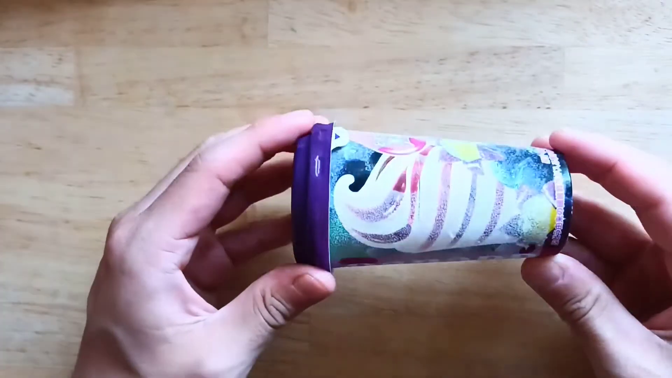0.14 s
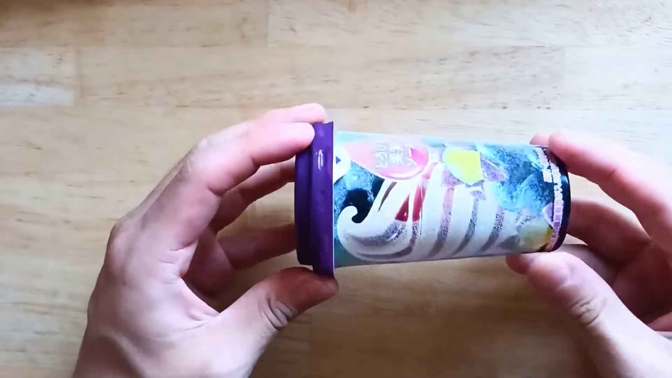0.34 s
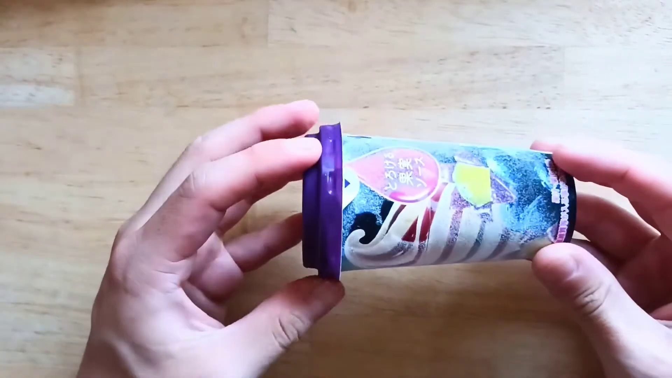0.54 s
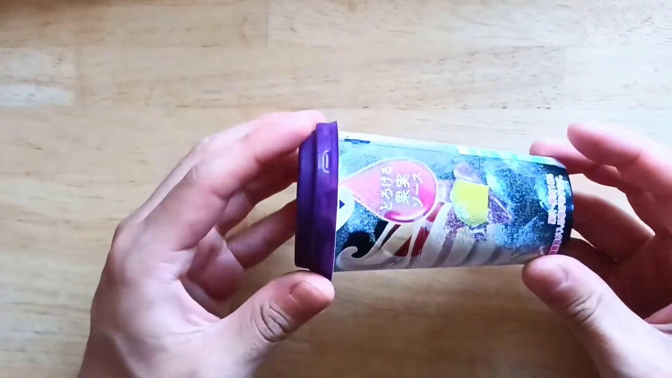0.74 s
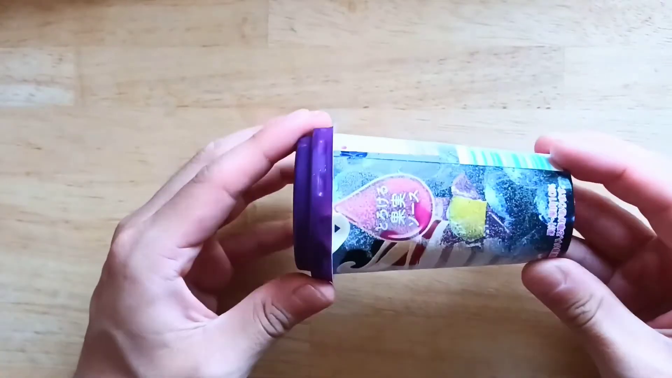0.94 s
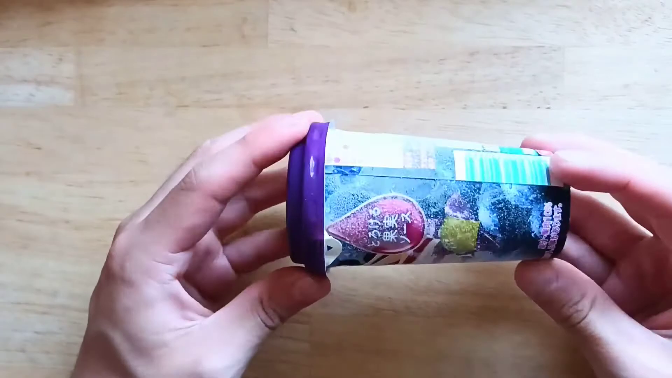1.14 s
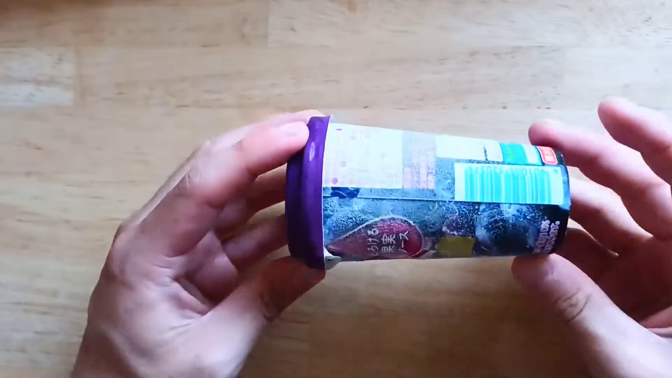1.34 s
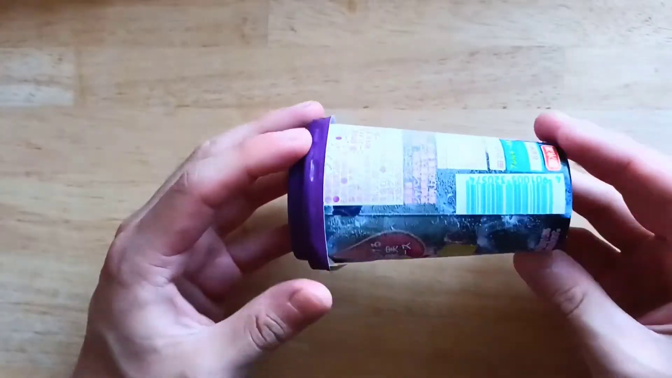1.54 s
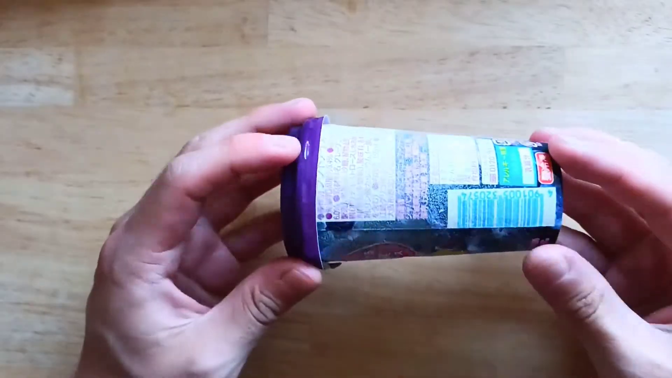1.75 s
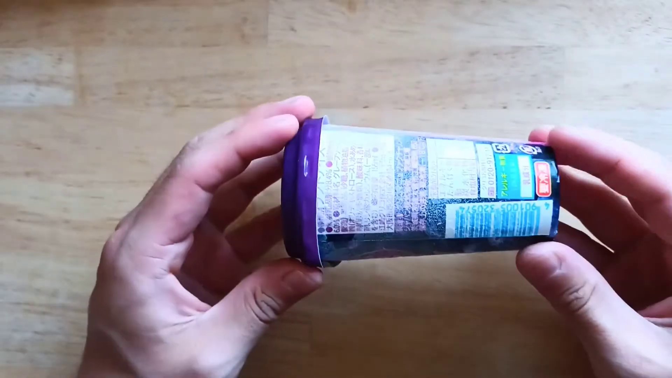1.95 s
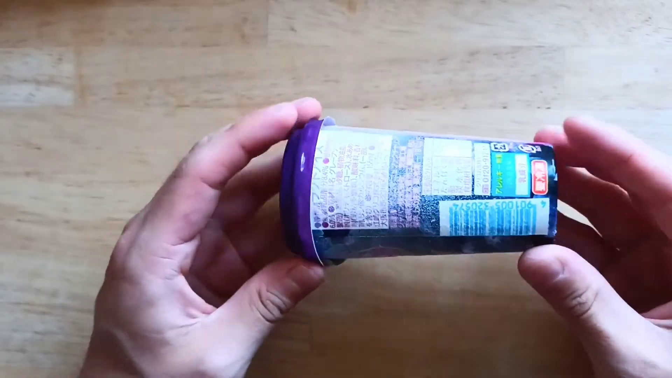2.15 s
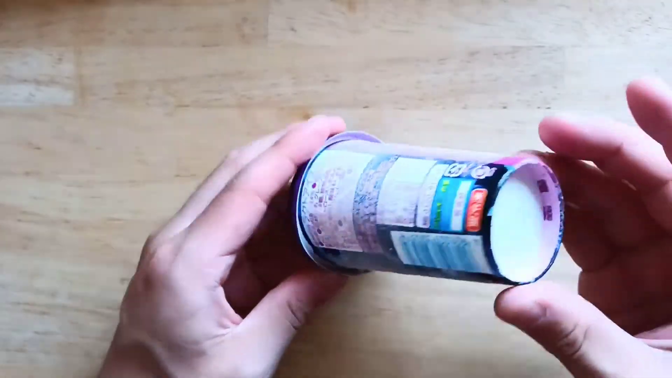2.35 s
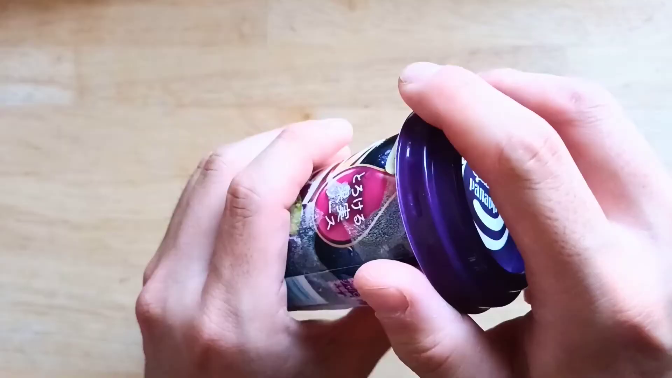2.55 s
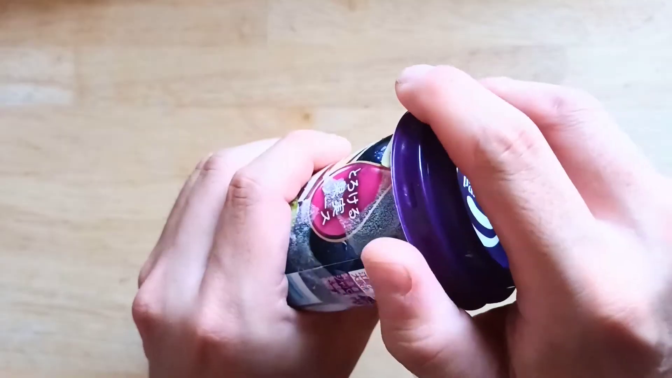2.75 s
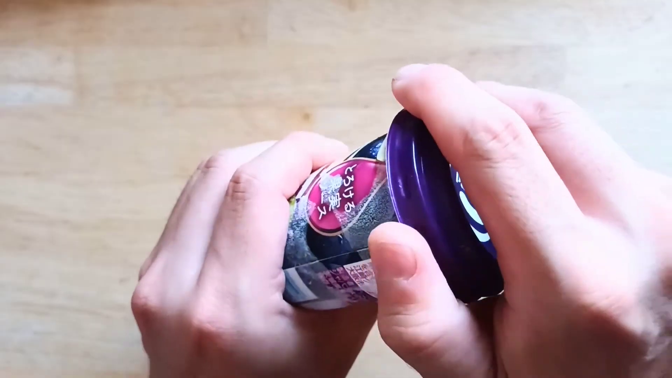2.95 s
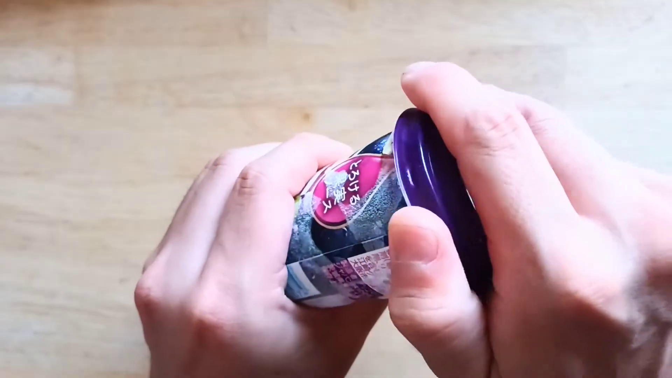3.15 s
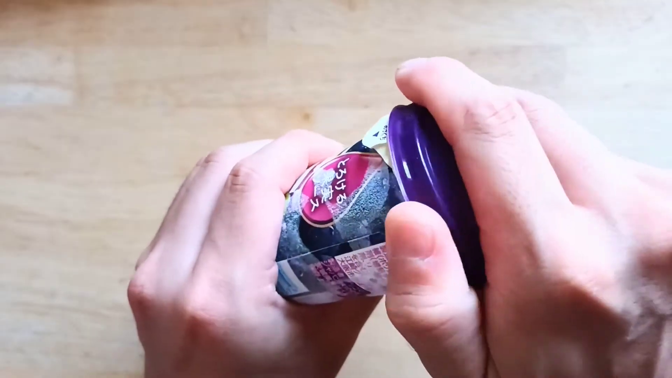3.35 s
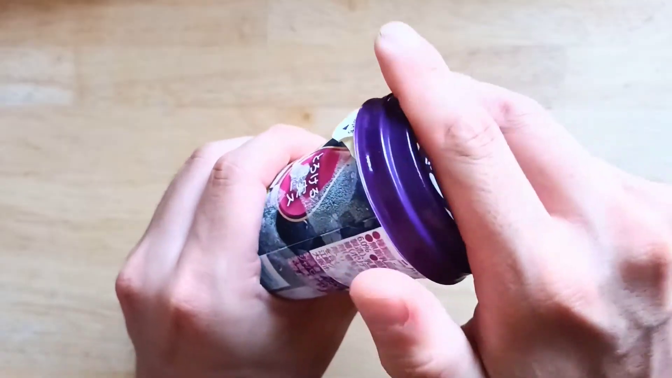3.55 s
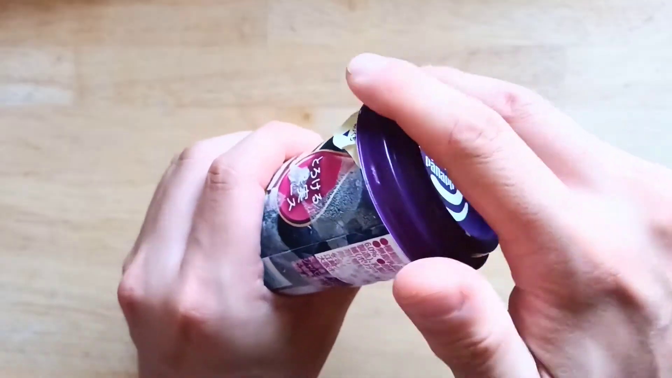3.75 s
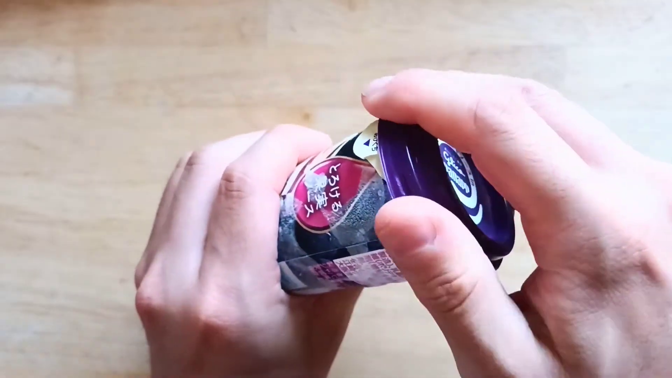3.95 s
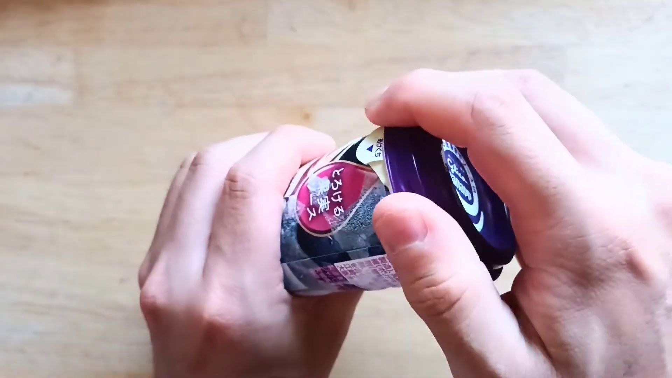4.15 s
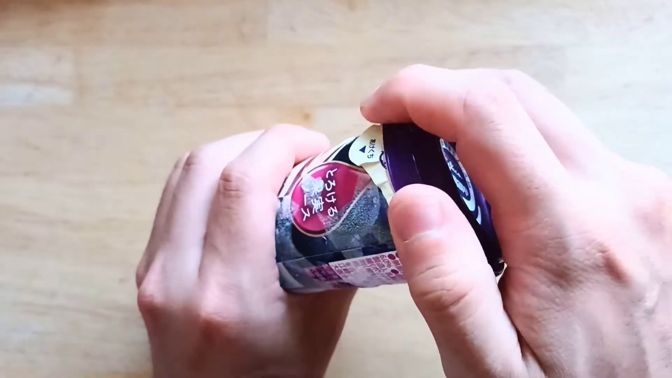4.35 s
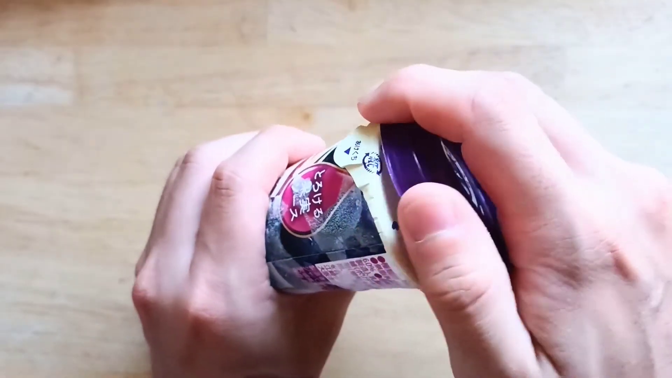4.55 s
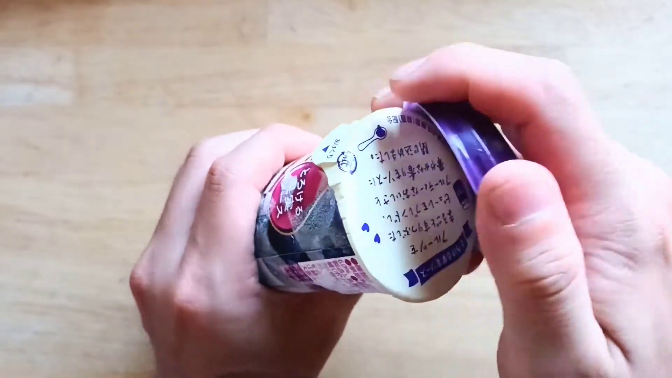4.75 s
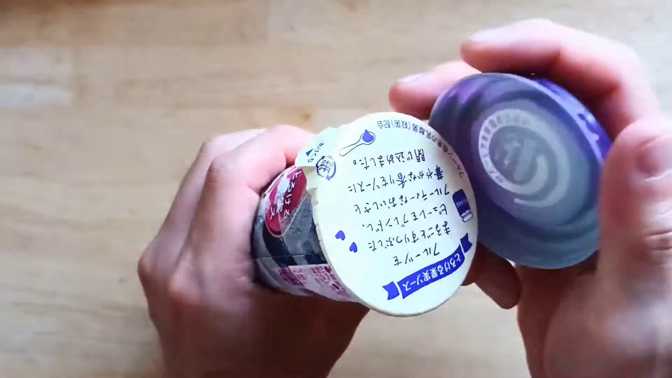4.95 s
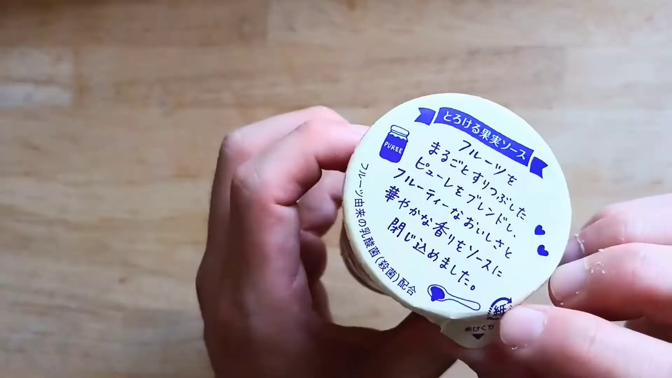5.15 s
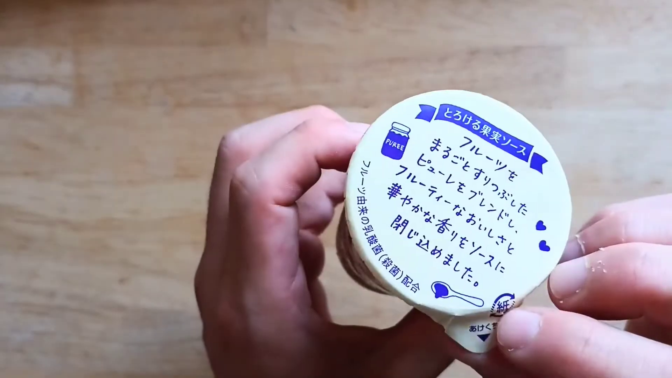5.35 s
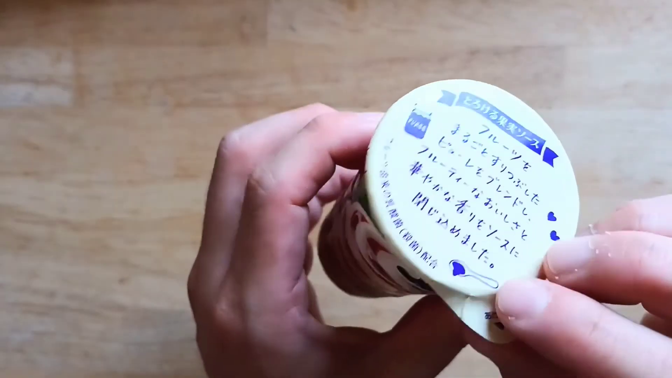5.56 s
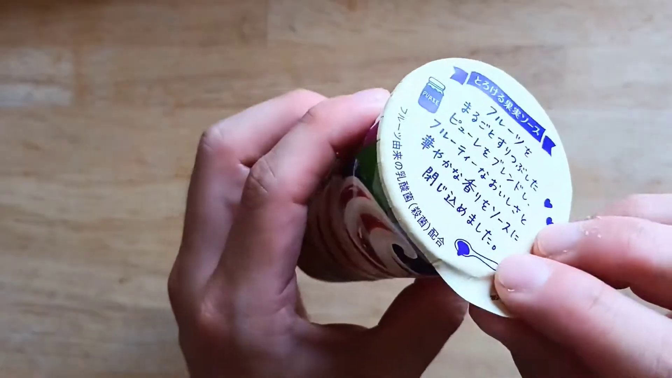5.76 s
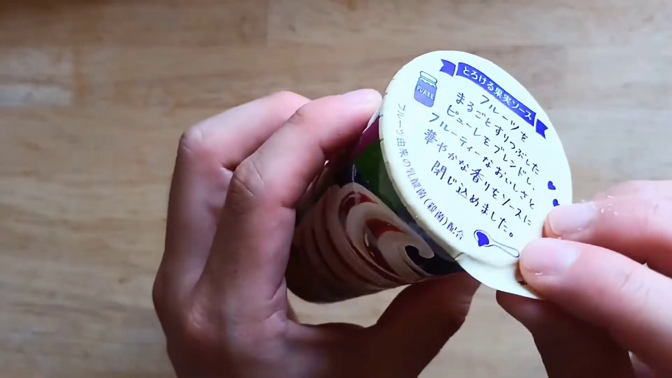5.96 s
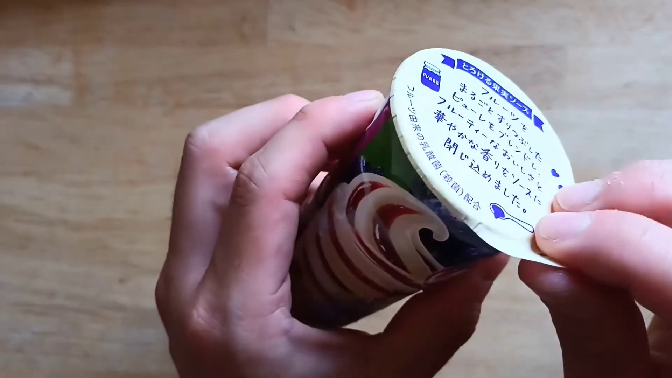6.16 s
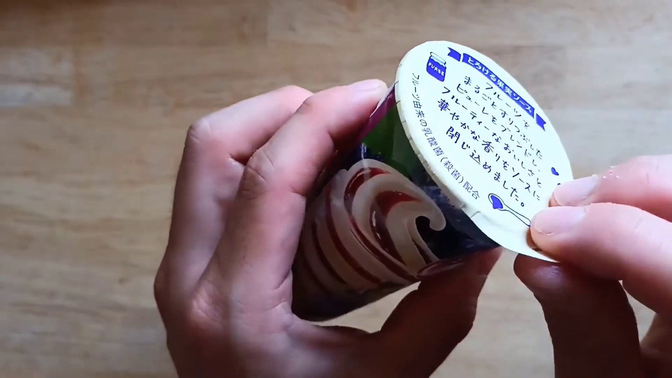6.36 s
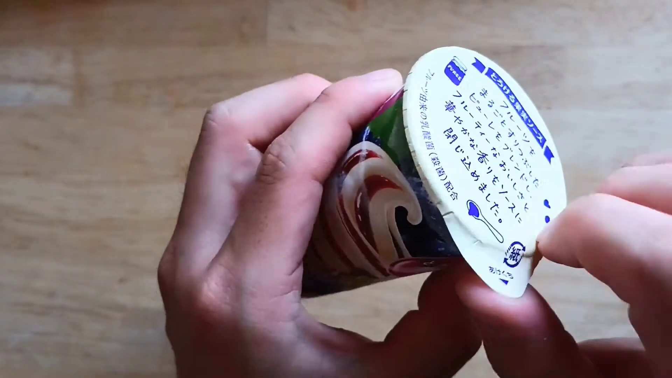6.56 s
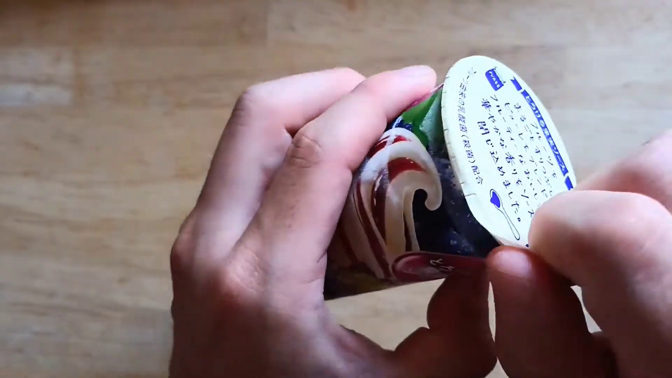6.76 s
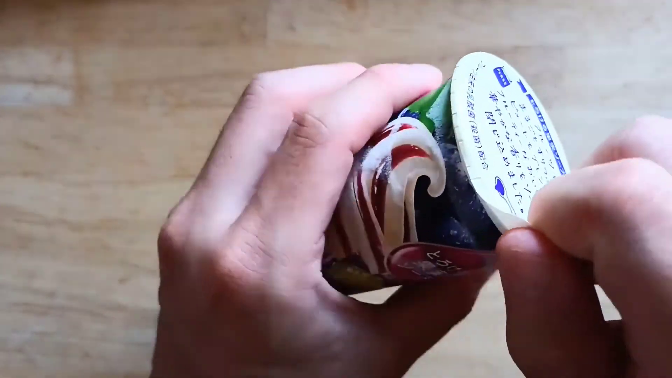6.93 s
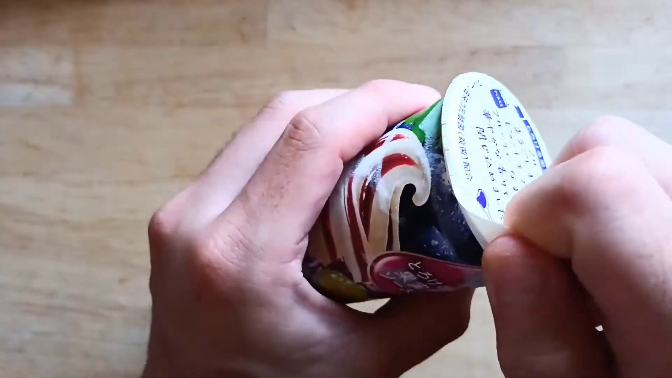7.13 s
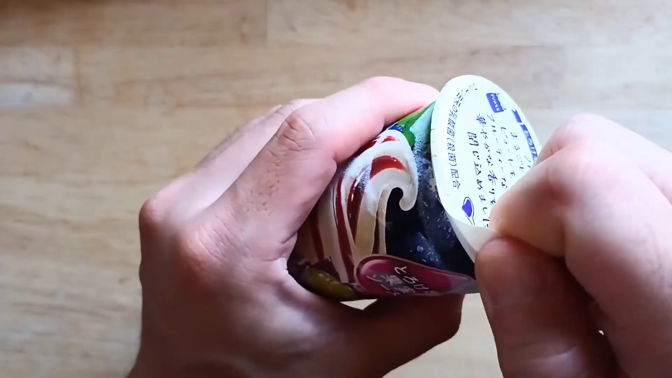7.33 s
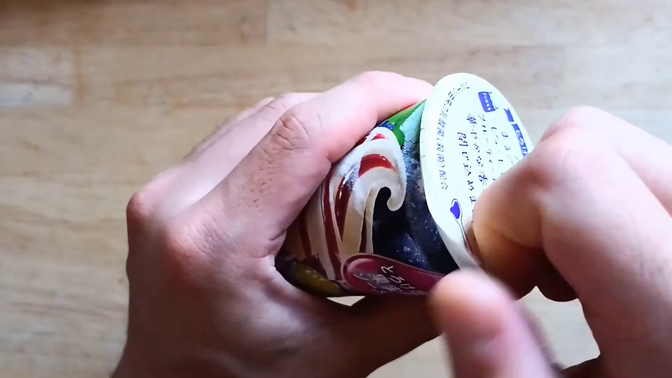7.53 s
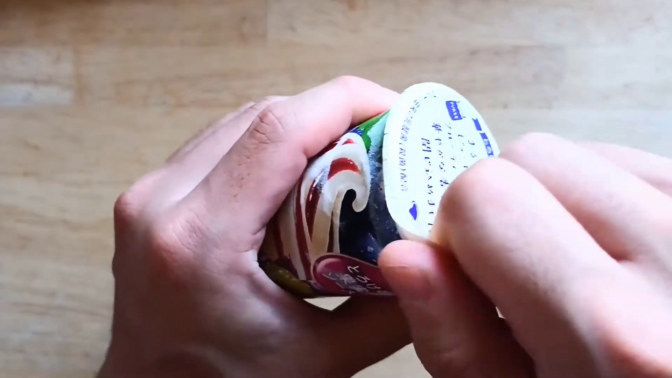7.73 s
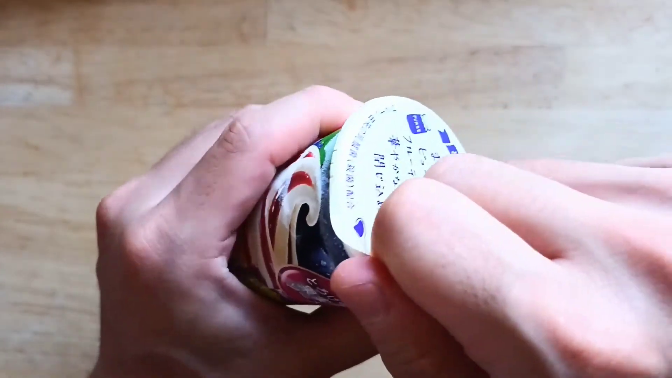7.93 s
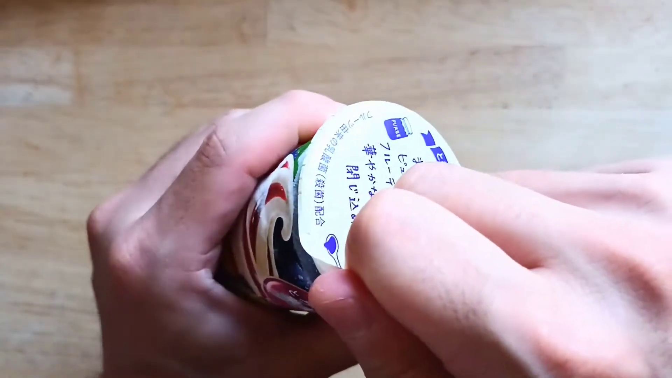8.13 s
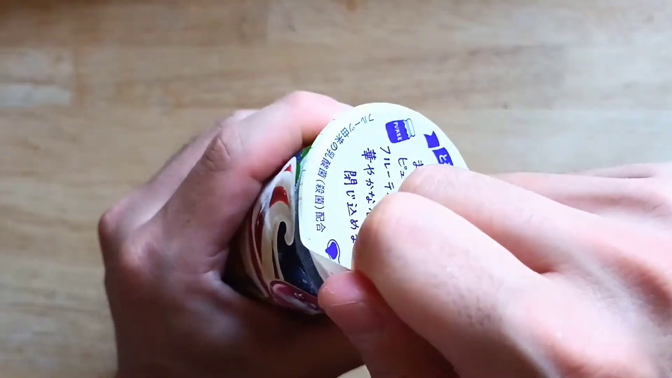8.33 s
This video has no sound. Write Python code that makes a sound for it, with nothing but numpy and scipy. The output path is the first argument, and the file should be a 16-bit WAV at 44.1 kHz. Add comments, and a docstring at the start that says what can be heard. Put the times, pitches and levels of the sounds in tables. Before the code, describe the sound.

Hands rub an ice cream cup, its plastic cap ticks and snaps off, then the foil seal cracks loose and crinkles.

```python
"""A small, quiet room; hands turn an ice cream cup close to a stereo microphone, stronger on the left.
Fingertips brush the cup's wall. The plastic overcap scrapes over the rim, snaps free and slides off
with small knocks and ticks. Then the foil seal is pulled by its tab: it cracks loose from the rim twice
and crinkles. Snaps and knocks are quickly damped modes; the rubbing is a stream of tiny slips.
The room answers briefly, over a steady low rush."""
import sys
import numpy as np
from scipy import signal
from scipy.fft import rfft, irfft, next_fast_len
from scipy.io import wavfile

SR = 44100
rng = np.random.default_rng(int(sys.argv[2]) if len(sys.argv) > 2 else 0)


def transcribe(u):
    """Save the signal u as a 16-bit wav file named by the first command-line argument.

    u: samples, shape (n,) or (channels, n), limited to [-1, 1]; the rate is SR.
    q: integer samples, one column per channel.
    """
    v = np.clip(np.atleast_2d(u).T, -1, 1)
    q = np.round(v * 32767).astype(np.int16)
    wavfile.write(sys.argv[1], SR, q)


N = 374409

# modes of the plastic cap: pitch_hz, level_db, t60_s
CAP_MODES = [(388, -20.5, 0.018), (820, -9.5, 0.034), (1204, -1.5, 0.013), (1476, -2, 0.011),
             (1940, -5, 0.021), (2340, -8.5, 0.019), (2770, -6.5, 0.014), (4300, -9, 0.018),
             (4750, -8.5, 0.0057), (6100, -19, 0.006), (8400, -17, .007)]
# cup wall under sliding contact, cap seated and cap loose: centre_hz, width_hz, level_db
SEATED_WALL = [(1350, 410, 3), (2155, 280, 5), (2920, 180, 2), (3840, 460, -4)]
LOOSE_WALL = [(1460, 1200, -9.5), (1995, 230, 6), (3020, 490, 1.5), (3800, 3100, -5.5)]
# hiss spectrum of scraping plastic and foil: frequency_hz, level_db
SCRAPE_HISS = [(2000, -9), (3800, -1), (6000, -1.5), (8300, 3), (10500, -1), (13000, -7.5), (16000, -16)]


def cap_snaps():
    """The cap's lip jumps the rim, then its far side lets go."""
    # start_s, level_db, note_hz, note_db, tilt_db_per_octave, crack_db, room_db, upper_mode_ratio
    releases = [(3.3002, -14.5, 1300, -0.5, 3.5, -17, -32.5, 1.0),
                (4.7442, -39.5, 2930, 3.5, 18.5, 5.5, -64, 1.24)]
    # what the cap throws into the room: frequency_hz, level_db
    spread = [(180, -55), (300, -30), (343, -12), (511, -23), (946, 1), (1120, -9), (1560, 0), (2140, -9),
              (2650, -3.5), (3130, -25), (4590, -17.5), (5340, -27), (7570, -23), (16000, -43)]
    return snaps(releases, CAP_MODES, spread, table_db=-32, t60_ratio=0.82, hollow_db=-0.5,
                 low_hz=200, split_hz=9400)


def seal_cracks():
    """The seal breaks from the rim; its taut flap sounds a note, higher the second time."""
    # start_s, level_db, note_hz, note_db, tilt_db_per_octave, crack_db, room_db, upper_mode_ratio
    releases = [(7.7449, -11.5, 1670, 0.5, 1.5, -14.5, -30.5, 0.993),
                (8.2820, -18, 2010, 4.5, 9, -6.5, -38, 1.065)]
    # the seal and the rim it is stuck to: pitch_hz, level_db, t60_s
    modes = [(780, -12.5, 0.013), (1190, -15, 0.035), (1450, -8.5, 0.037), (2280, -4, 0.012),
             (2720, -3, 0.01), (3060, -1, 0.0094), (3230, -18, 0.02), (3330, -21, 0.027),
             (4150, -10.5, 0.019), (6280, -15.5, 0.0083), (6740, -34, 0.0076)]
    # what the seal throws into the room: frequency_hz, level_db
    spread = [(180, -61), (300, -42), (678, -16.5), (885, -15.5), (1300, -12), (1430, -0.5), (1660, 0),
              (2610, -4.5), (3350, -15), (3700, -15), (5520, -25), (7690, -18.5), (14500, -41),
              (16000, -52)]
    return snaps(releases, modes, spread, table_db=-15.5, t60_ratio=1.0, hollow_db=-7,
                 low_hz=690, split_hz=5000)


def snaps(releases, modes, spread, table_db, t60_ratio, hollow_db, low_hz, split_hz, table_s=0.002426):
    """Stored strain lets go at once: the part rings, the table reflects it, hollow and room answer."""
    # the cup's hollow rings on faintly: pitch_hz, level_db, t60_s
    hollow_modes = [(1490, 1, 0.14), (1690, -16, 0.24), (4140, -14, .14)]
    out, t = np.zeros((2, N)), np.arange(SR // 3) / SR
    hollow = sum(damped_sine(t, hz, db + hollow_db, t60) for hz, db, t60 in hollow_modes)
    for s, db, note_hz, note_db, db_per_octave, crack_db, room_db, ratio in releases:
        tilt_db = lambda f: db_per_octave * np.log2(np.clip(f, 2000, 3500) / 2000)
        tilted = [(hz * ratio if hz > note_hz else hz, level + tilt_db(hz), t60)
                  for hz, level, t60 in modes]
        blow = amp(db) * ring(sorted(tilted + [(note_hz, note_db, 0.018)]), crack_db, scatter_db=0)
        blow = blow + amp(table_db) * np.roll(blow, round(table_s * SR))
        blow = filtered(blow, lambda f: 1j * f / (low_hz + 1j * f))  # a small part radiates little bass
        add(out, s, at_microphones(blow, split_hz))
        add(out, s, amp(room_db) * at_microphones(hollow, split_hz=11000))
        add(out, s, amp(room_db) * room_tail(lambda f: amp(along(spread, f) + tilt_db(f)), t60_ratio))
    return out


def ring(modes, crack_db, scatter_db, crack_t60_s=0.011, crack_low_hz=1500, crack_top_hz=9500):
    """One blow: quickly damped modes under a short burst of fracture noise."""
    t = np.arange(SR // 12) / SR
    offsets_db = rng.normal(0, 1, len(modes)) * scatter_db
    body = sum((-1) ** k * damped_sine(t, hz, db + offsets_db[k], t60)
               for k, (hz, db, t60) in enumerate(modes))
    band = lambda f: (1j * f / (crack_low_hz + 1j * f)) ** 2 / (1 + (f / crack_top_hz) ** 6)
    noise = unit(filtered(rng.standard_normal(len(t)), lambda f: resonance(f, 1900, 9100) * band(f)))
    return body + amp(crack_db - 60 * t / crack_t60_s) * noise


def knocks(gain_db=2, relative_width=0.46):
    """Soft contacts ring the cap around a pitch set by where they land."""
    # cap and fingers meet the cup: start_s, level_db, centre_hz
    contacts = [(2.664, -42.5, 1420), (2.755, -46, 1380), (3.456, -34, 2890), (3.563, -41.5, 1370),
                (3.854, -38, 1470), (3.897, -39, 1210), (3.973, -35, 1300), (4.129, -39, 1270),
                (4.394, -43, 1460), (4.521, -36, 1700), (4.631, -38.5, 1250), (5.071, -38.5, 910),
                (6.025, -43.5, 1870), (7.628, -38.5, 1260), (7.663, -46.5, 2310)]
    out = np.zeros(N)
    for s, db, hz in contacts:
        blow = ring(CAP_MODES, crack_db=-4.5, scatter_db=4.5)
        knock = filtered(blow, lambda f: resonance(f, hz, relative_width * hz))
        add(out, s, amp(db + gain_db) * knock / np.abs(knock).max())
    return in_room(out, room_db=-8, split_hz=7900)


def ticks(gain_db=4, t60_s=0.0074, attack_s=0.00054, relative_width=0.27):
    """Plastic edges and foil creases tick: milliseconds of crackle in one broad, high resonance."""
    # the clearest ticks: start_s, level_db, centre_hz, left_minus_right_db
    clear_ticks = [(0.6345, -45, 8140, 2.5), (1.5988, -43.5, 8690, -6), (2.8614, -40.5, 9560, 6),
                   (2.9058, -40.5, 9110, 2.0), (2.9367, -39, 12000, 0.5), (3.1981, -34.5, 10400, 2.5),
                   (3.235, -26, 10900, 9), (3.362, -30.5, 10200, 3.0), (3.4321, -35.5, 11200, 2.5),
                   (3.458, -30, 7900, 4), (3.8004, -39, 9630, 3), (3.897, -33.5, 8400, -0.5),
                   (3.9719, -33.5, 8850, 1), (4.7102, -31, 14700, 4), (4.7334, -35, 7280, 5),
                   (4.7447, -28.5, 7140, 5), (5.0424, -37.5, 8550, 4), (5.0724, -37.5, 8840, 3),
                   (6.757, -46, 8370, 1.0), (8.2172, -44, 11300, 6)]
    out, t = np.zeros((2, N)), np.arange(SR // 20) / SR
    envelope = amp(-60 * t / t60_s) * (1 - np.exp(-t / attack_s))
    for s, db, hz, pan_db in list(clear_ticks) + strain_ticks():
        crackle = uneven(envelope * rng.standard_normal(len(t)), unlike=0.94)
        tick = filtered(crackle, lambda f: resonance(f, hz, relative_width * hz) * resonance(f, hz, 2 * hz))
        pan = amp([[pan_db / 2], [-pan_db / 2]])
        add(out, s, amp(db + gain_db) * pan * tick / np.abs(tick).max())
    return in_room(out, room_db=-9, split_hz=12200)


def strain_ticks(per_s=27, centre_hz=9200, pan_db=8, scatter_db=7):
    """Strained plastic and foil tick at uneven moments; gives rows for ticks()."""
    # spells of strain: start_s, end_s, level_db
    strains = [(2.822, 3.057, -55), (8.076, 8.29, -52.5), (8.328, 8.381, -31), (8.429, 8.479, -43)]
    rows = []
    for start, end, db in strains:
        count = max(1, round((end - start) * per_s))
        for k, (when, size) in enumerate(rng.random((count, 2))):
            s = start + (end - start) * (k + when) / count
            rows.append((s, db + scatter_db * (2 * size - 1), centre_hz, pan_db))
    return rows


def cap_rasp():
    """The cap's lip rasps on the rim with each push."""
    # peak_s, rise_s, fall_s, hiss_db, body_db
    pushes = [(3.212, .014, .03, -56, -57), (3.243, 0.013, 0.017, -35, -38.5),
              (3.458, 0.0069, 0.0074, -43, -44), (3.786, 0.024, 0.015, -54.5, -54),
              (4.207, 0.026, 0.017, -64, -59), (4.32, 0.066, 0.059, -70, -63),
              (4.408, 0.022, 0.081, -54, -52), (4.628, 0.035, 0.017, -48.5, -49)]
    return friction(strokes(pushes), SCRAPE_HISS, SEATED_WALL,
                    slips_per_s=4200, scatter_db=2, hiss_db=1, body_db=0.5)


def cap_slide():
    """The cap is drawn off at an even speed, first tilted on the rim, then loose."""
    # the two draws: start_s, length_s, hiss_db, body_db
    draws = [(4.655, 0.086, -59.5, -55), (4.752, 0.14, -60, -52.5)]
    # cup wall with the cap tilted: centre_hz, width_hz, level_db
    tilted_wall = [(1560, 390, -6), (2870, 120, 3), (3970, 890, -25)]
    tilted = friction(even_draw(*draws[0]), SCRAPE_HISS, tilted_wall,
                      slips_per_s=6300, scatter_db=1, hiss_db=0, body_db=-0.5)
    loose = friction(even_draw(*draws[1]), SCRAPE_HISS, LOOSE_WALL,
                     slips_per_s=7600, scatter_db=3, hiss_db=0.5, body_db=0)
    return tilted + loose


def foil_crinkle():
    """The foil crinkles in sparser grains with each tug at its tab."""
    # peak_s, rise_s, fall_s, hiss_db, body_db
    tugs = [(7.578, 0.091, 0.02, -64, -62.5), (7.63, 0.034, .025, -60, -59), (7.68, .03, 0.095, -64, -61.5),
            (8.24, 0.23, 0.079, -70, -78), (8.35, 0.053, 0.05, -47, -55), (8.464, 0.035, .045, -54.5, -51)]
    return friction(strokes(tugs), SCRAPE_HISS, LOOSE_WALL,
                    slips_per_s=2400, scatter_db=3.5, hiss_db=0.5, body_db=1.5)


def finger_brushes():
    """Skin brushes smoothly over the cup as it is turned."""
    # peak_s, rise_s, fall_s, hiss_db, body_db
    brushes = [(0.057, .036, .02, -57.5, -64), (0.398, .03, .013, -64.5, -76),
               (0.635, 0.0071, 0.015, -50.5, -78), (0.82, .05, 0.032, -67, -76),
               (1.295, .013, 0.032, -66, -76), (1.622, 0.0087, .07, -64.5, -75),
               (2.245, .02, .025, -61.5, -65), (2.395, 0.09, 0.082, -66, -65.5),
               (2.585, .016, 0.018, -59, -60), (2.69, 0.024, .023, -52, -56.5),
               (5.055, .03, .03, -61.5, -57.5), (5.5, .02, 0.021, -65, -59.5),
               (5.577, 0.04, 0.075, -60, -61.5), (6.56, 0.21, 0.15, -66, -63),
               (6.76, 0.023, 0.037, -60.5, -56)]
    # hiss spectrum of skin on the cup: frequency_hz, level_db
    skin_hiss = [(2500, -55), (4000, -16.5), (6000, -10), (8500, -5), (10500, -8.5), (13000, -16),
                 (16000, -21)]
    return friction(strokes(brushes), skin_hiss, SEATED_WALL,
                    slips_per_s=10000, scatter_db=6.5, hiss_db=0.5, body_db=-0.5)


def friction(gains, hiss_spectrum, wall, slips_per_s, scatter_db, hiss_db, body_db):
    """Tiny slips of uneven size hiss at the contact and excite the wall."""
    sizes = rng.choice([-1, 1], N) * amp(scatter_db * np.clip(rng.standard_normal(N), -2, 2))
    slips = (rng.random(N) < slips_per_s / SR) * sizes
    hiss = unit(filtered(uneven(slips, unlike=0.57), lambda f: amp(along(hiss_spectrum, f))))
    wall_response = lambda f: sum((-1) ** k * amp(db) * resonance(f, hz, width)
                                  for k, (hz, width, db) in enumerate(wall))
    body = unit(filtered(slips, lambda f: resonance(f, 1700, 5100) * wall_response(f)))
    return amp(hiss_db) * gains[0] * hiss + amp(body_db) * gains[1] * body


def strokes(rows):
    """Hiss and body gains of short strokes that peak and die away."""
    t = np.arange(N) / SR
    gains = np.zeros((2, N))
    for s, rise, fall, hiss_db, body_db in rows:
        near = slice(*np.searchsorted(t, [s - 5 * rise, s + 5 * fall]))
        gains[:, near] += amp([[hiss_db], [body_db]]) * swell(t[near], s, s, rise, fall)
    return gains


def even_draw(start_s, length_s, hiss_db, body_db, edge_s=0.0083):
    """Hiss and body gains of one even slide."""
    t = np.arange(N) / SR
    return amp([[hiss_db], [body_db]]) * swell(t, start_s, start_s + length_s, edge_s, edge_s)


def swell(t, start, end, rise, fall, drop_db=13.5, roundness=1.66):
    """Gain of 1 from start to end, down by drop_db one rise before and one fall after."""
    away = np.maximum(start - t, 0) / rise + np.maximum(t - end, 0) / fall
    return amp(-drop_db * np.minimum(away, 10) ** roundness)


def finger_thuds(pitch_hz=290, t60_s=0.029):
    """A soft finger pad gives the cup one low push that is damped at once."""
    # start_s, level_db
    landings = [(3.24, -42), (5.072, -43.5), (8.477, -40.5)]
    out, t = np.zeros(N), np.arange(SR // 12) / SR
    for s, db in landings:
        add(out, s, damped_sine(t, pitch_hz, db, t60_s))
    return in_room(out, room_db=-24, split_hz=6000)


def in_room(x, room_db, split_hz):
    """A close sound at both microphones, with the room's answer."""
    # spectrum of the reverberation: frequency_hz, level_db
    colour = [(300, 10), (2000, -4), (3200, 2.5), (6000, -1), (14000, 2.5)]
    tail = room_tail(lambda f: amp(along(colour, f)), t60_ratio=0.58)
    wet = signal.fftconvolve(np.atleast_2d(x), tail / np.linalg.norm(tail[0]), axes=1)[:, :N]
    return at_microphones(x, split_hz) + amp(room_db) * wet


def room_tail(colour, t60_ratio, build_s=0.00054):
    """A diffuse stereo tail of noise; the middle frequencies last longest."""
    # room decay, scaled by t60_ratio: frequency_hz, base_t60_s
    decay = [(300, 0.23), (1500, 0.38), (3000, .37), (6000, 0.36), (12000, 0.31)]
    noise = unit(filtered(rng.standard_normal((2, SR // 2)), colour))
    hz, t, spectra = signal.stft(noise, SR, nperseg=256)
    fade = amp(-60 * t / along(decay, hz)[:, None] / t60_ratio) * (1 - np.exp(-t / build_s))
    return signal.istft(spectra * fade, SR, nperseg=256)[1]


def room_tone(level_db=-57, low_cut_hz=52):
    """Steady low rush of the room with a faint microphone hiss."""
    # rush and hiss: frequency_hz, level_db
    spectrum = [(35, -9.5), (60, 0.5), (139, 0), (176, -1.5), (294, -2.5), (389, -7.5), (417, -8.5),
                (621, -9), (1090, -12), (1950, -13.5), (4320, -24.5), (6580, -25.5), (7750, -21.5),
                (14900, -25.5), (16000, -22.5)]
    # likeness of left and right: frequency_hz, correlation
    likeness = [(60, 0), (130, 0), (3100, 0), (5000, 0), (6800, 0.58), (9000, 1), (15000, 1)]
    side_gain = lambda f: np.tan(np.arccos(np.clip(along(likeness, f), -1, 1)) / 2)
    colour = lambda f: amp(along(spectrum, f)) * f ** 2 / np.sqrt(f ** 4 + low_cut_hz ** 4)
    noise = rng.standard_normal((2, N))
    mid, side = filtered(noise, lambda f: colour(f) * [np.ones_like(f), side_gain(f)])
    return amp(level_db) * unit(np.array([mid + side, mid - side]))


def at_microphones(x, split_hz, left_lag_s=0.0008):
    """Below split_hz, sound reaches the left microphone later than the right."""
    left, right = np.broadcast_to(x, (2, x.shape[-1]))
    low = lambda f: 1 / (1 + (f / split_hz) ** 8)
    late_left = filtered(left, lambda f: low(f) * np.exp(-2j * np.pi * f * left_lag_s) + 1 - low(f))
    return np.array([late_left, right])


def uneven(x, unlike):
    """Each tiny slip or crack radiates with its own strength toward each microphone."""
    return x * (1 + unlike * rng.standard_normal((2, len(x)))) / np.sqrt(1 + unlike ** 2)


def damped_sine(t, hz, db, t60):
    """One mode, falling 60 dB in t60 seconds."""
    return amp(db - 60 * t / t60) * np.sin(2 * np.pi * hz * t)


def resonance(f, centre, width):
    """Causal response of one resonance."""
    return 1j * f * width / (centre ** 2 - f ** 2 + 1j * f * width)


def filtered(x, response):
    """Pass x through a complex frequency response."""
    n = x.shape[-1]
    padded = next_fast_len(n + 8192)
    return irfft(rfft(x, padded) * response(np.fft.rfftfreq(padded, 1 / SR)), padded)[..., :n]


def along(points, hz):
    """Read (frequency_hz, value) points on a log frequency axis."""
    frequencies, values = np.transpose(points)
    return np.interp(np.log(hz + 1), np.log(frequencies + 1), values)


def amp(db):
    """Decibels to gain."""
    return 10 ** (np.asarray(db) / 20)


def unit(x):
    """Scale to rms 1."""
    return x / np.sqrt(np.mean(x ** 2) + 1e-20)


def add(track, s, sound):
    """Mix a sound into the track at s seconds."""
    part = track[..., round(s * SR):][..., :sound.shape[-1]]
    part += sound[..., :part.shape[-1]]


def scene():
    """Close handling of the cup over the room tone."""
    impacts = cap_snaps() + seal_cracks() + knocks() + finger_thuds() + ticks()
    skin, rasp = finger_brushes(), cap_rasp()
    rubbing = in_room(skin + cap_slide() + foil_crinkle(), room_db=-13.5, split_hz=6400)
    rasping = in_room(rasp, room_db=-8, split_hz=6800)  # the rim radiates widely, so more room
    return impacts + rubbing + rasping + room_tone()


def record(dry, top_hz=16100):
    """The left microphone is stronger below the treble; nothing passes above top_hz."""
    # microphone balance: frequency_hz, left_minus_right_db
    balance = [(60, 9.5), (200, 9.5), (700, 10), (2400, 11.5), (4400, 2.5), (8000, 0), (15000, 1.5)]

    def sensitivity(f):
        right = amp(-along(balance, f))
        return np.array([np.ones_like(f), right]) * np.sqrt(2 / (1 + right ** 2))
    return filtered(filtered(dry, sensitivity), lambda f: f < top_hz)


dry = scene()
out = record(dry)
transcribe(out)
```